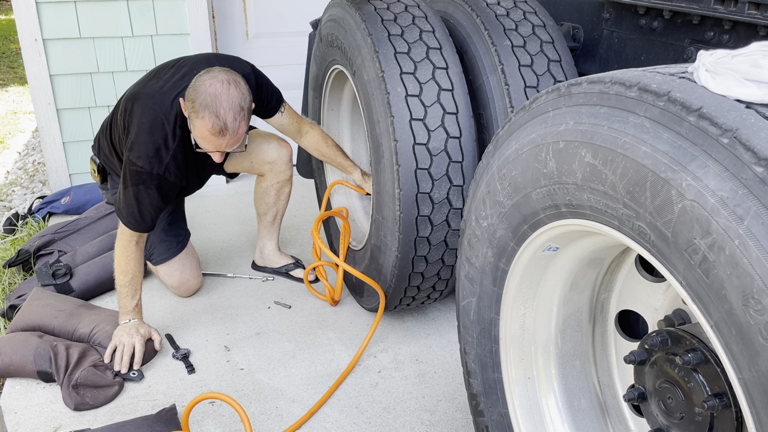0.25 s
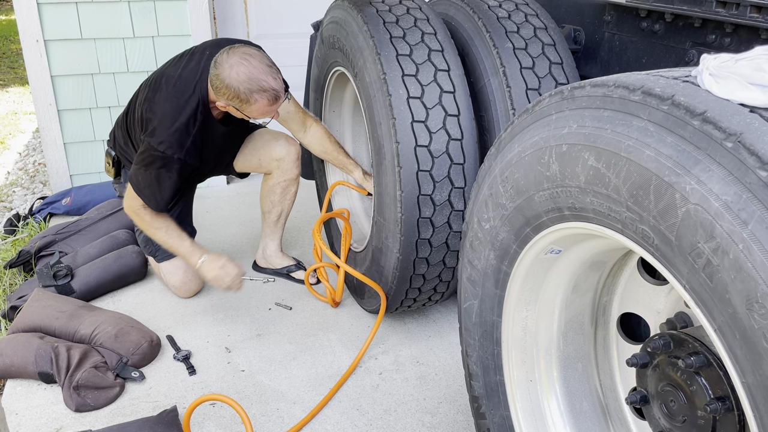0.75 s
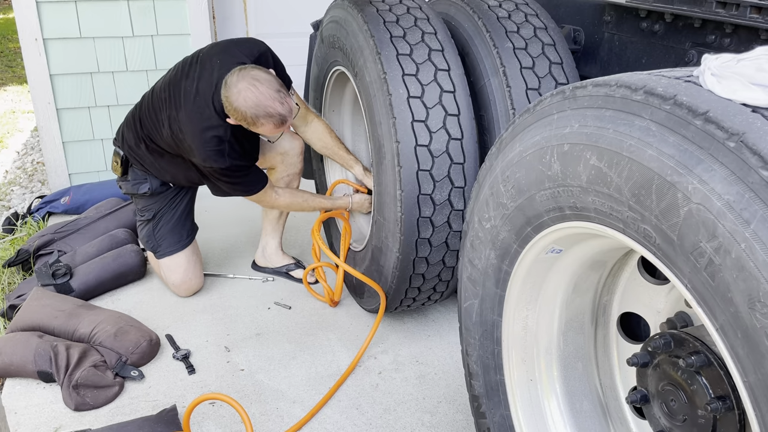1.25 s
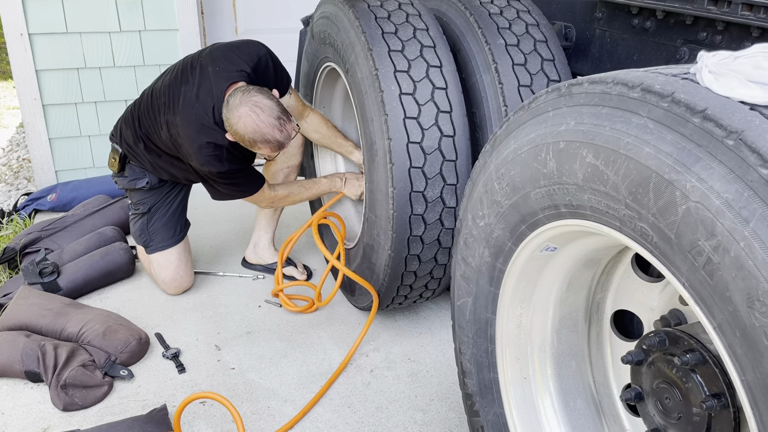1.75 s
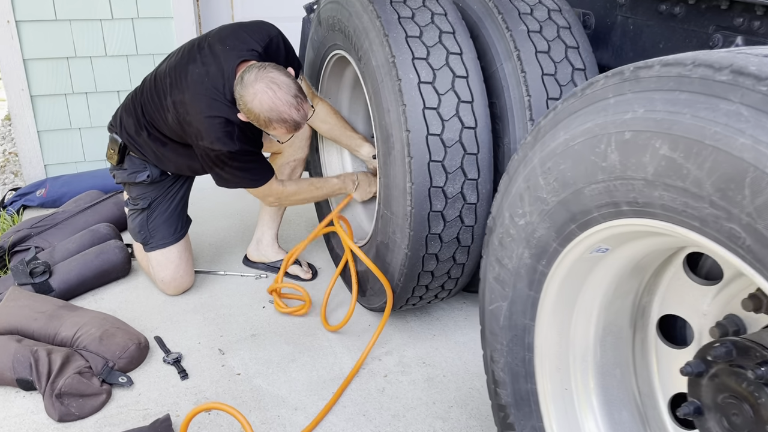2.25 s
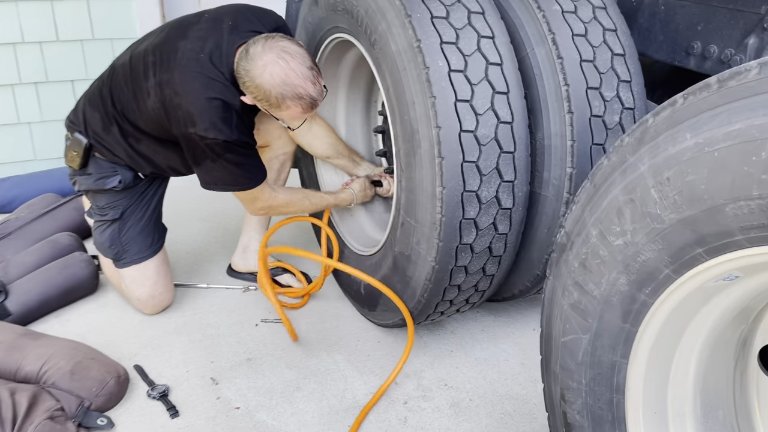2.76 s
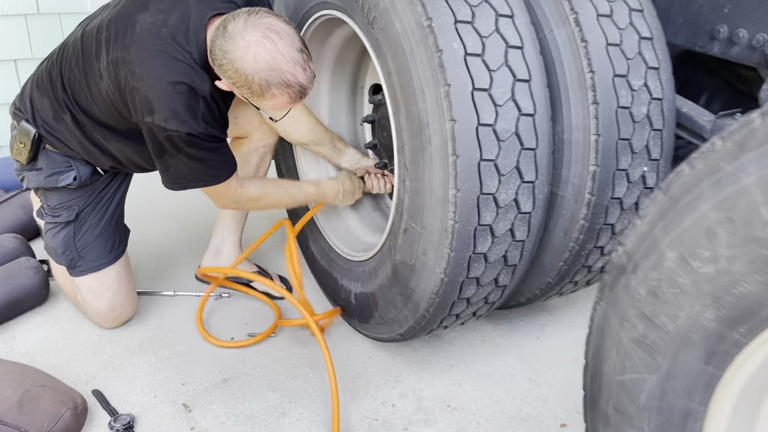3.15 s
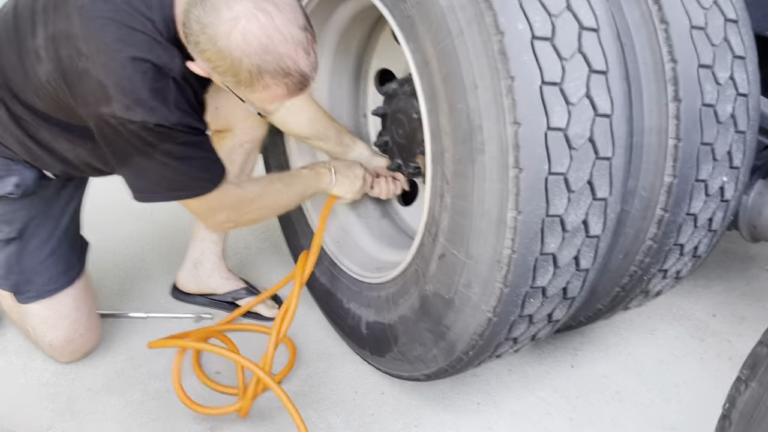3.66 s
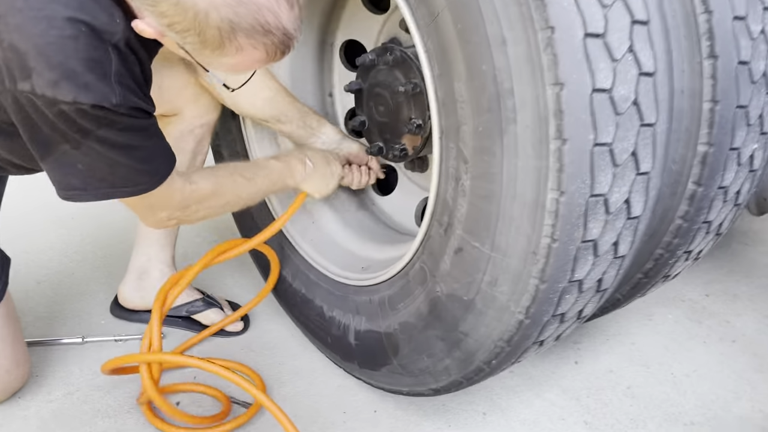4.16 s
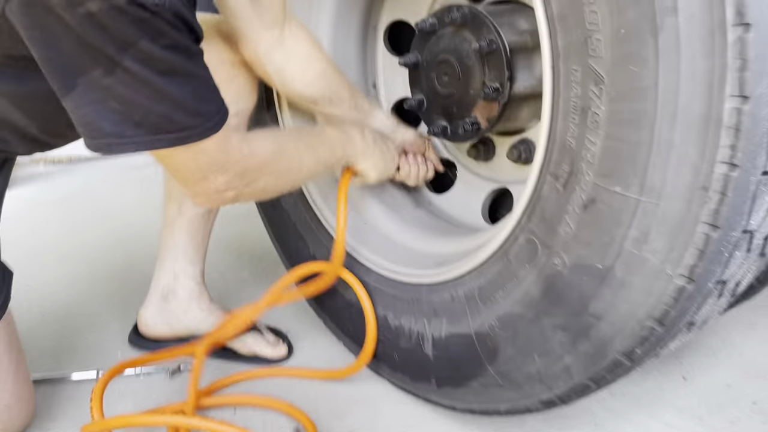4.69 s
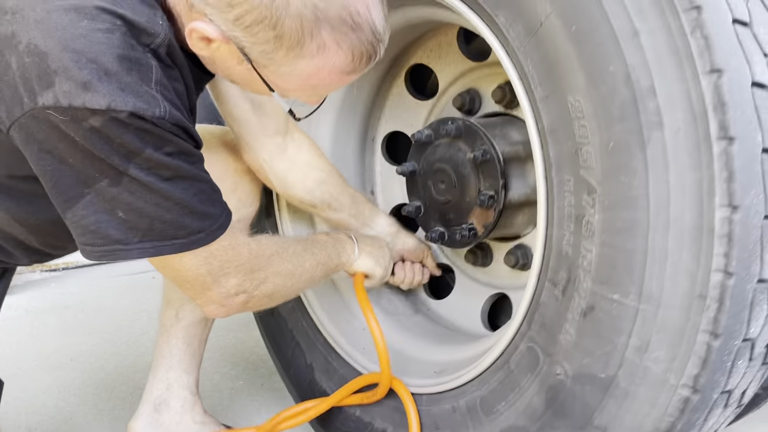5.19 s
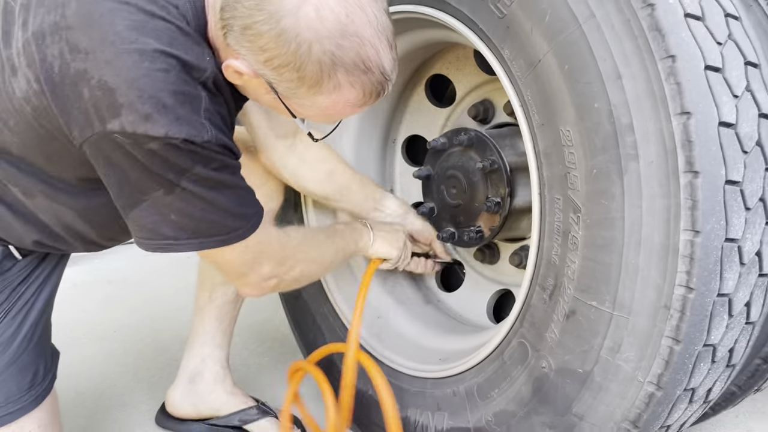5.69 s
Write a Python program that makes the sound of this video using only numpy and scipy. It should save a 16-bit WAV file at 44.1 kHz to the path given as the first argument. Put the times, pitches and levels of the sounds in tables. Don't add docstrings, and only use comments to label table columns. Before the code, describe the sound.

Steady rough diesel idle in a yard; as the listener walks up to a wheel, a bright air leak emerges, squeaks briefly, then metal clinks.

```python
import sys
import numpy as np
from scipy import signal
from scipy.fft import rfft, irfft, next_fast_len
from scipy.io import wavfile
from scipy.ndimage import uniform_filter1d

SR = 44100
rng = np.random.default_rng(int(sys.argv[2]) if len(sys.argv) > 2 else 0)


def output_pcm(signal):
    pcm = np.clip(np.atleast_2d(signal).T, -1, 1) * 32767
    wavfile.write(sys.argv[1], SR, np.round(pcm).astype(np.int16))


def undo_db(level):
    steps = np.asarray(level, float) / 20
    return 10 ** steps


N = 261513

CYCLE_HZ = 5.0
# f/Hz, share 0-1
LIKENESS = [(60, .98), (300, .85), (600, .55), (1000, .28), (2100, .1), (2700, .62), (4000, .72),
            (5000, .6), (6000, .7), (8000, .94), (12000, .955), (14500, .98)]
# f/Hz, share 0-1
REPEAT = [(100, .4), (300, .55), (800, .55), (1200, .45), (2000, .3), (3000, .2), (5000, .05)]


def rms_one(x):
    return x / np.sqrt(np.mean(x ** 2) + 1e-20)


def in_time(rows):
    s, *columns = np.transpose(rows)
    return [np.interp(np.arange(N) / SR, s, c) for c in columns]


def at_hz(points, hz):
    table_hz, values = np.array(points).T
    return np.interp(np.log(hz), np.log(table_hz), values)


def drift(rate):
    r = np.exp(-80 * np.pi * rate / SR)
    noise = rng.standard_normal(N // 40 + 2002)
    slow = signal.lfilter([1], [1, -2 * r, r * r], noise)[2000:]
    return np.interp(np.arange(N) / 40, np.arange(len(slow)), rms_one(slow))


def sine(hz, spread=0, partner=0):
    apart = spread * rng.uniform(-0.95, 1) * np.array([[1], [-1]])
    phase = 2 * np.pi * (np.cumsum(hz) / SR + rng.random()) + apart
    return np.sqrt(2) * np.imag((1 + partner) * np.exp(1j * phase))


def noise_bands(colour, low_hz):
    edges = low_hz * 2 ** (np.arange(40) / 3)
    edges = edges[edges < 19000]
    white = rng.standard_normal((2, 2, N))
    bands = []
    for k, (low, high) in enumerate(zip(edges, edges[1:])):
        band_pass = signal.butter(2, [low, high], "band", fs=SR, output="sos")
        mid, side = signal.sosfilt(band_pass, white[k % 2])
        hz = np.sqrt(low * high)
        alike = np.clip(at_hz(LIKENESS, hz), 0, 1)
        stereo = np.sqrt(1 + alike) * mid + np.sqrt(1 - alike) * side * [[1], [-1]]
        bands.append((hz, undo_db(at_hz(colour, hz)) * stereo))
    total = np.sqrt(sum(np.mean(b ** 2) for hz, b in bands))
    return [(hz, b / total) for hz, b in bands]


def repeating(x, share):
    size = round(SR / CYCLE_HZ)
    cycles = np.pad(x, [(0, 0), (0, -N % size)]).reshape(len(x), -1, size)
    fresh = np.sqrt(1 - share ** 2)
    cycles[:, 0] /= fresh
    return signal.lfilter([fresh], [1, -share], cycles, axis=1).reshape(len(x), -1)[:, :N]


def resonate(x, hz, width_hz):
    r, w = np.exp(-np.pi * width_hz / SR), 2 * np.pi * hz / SR
    return signal.lfilter([1, 0, -1], [1, -2 * r * np.cos(w), r * r], x)


def walked():
    # t/s, share of the way 0-1
    steps = [
        (0, 0.11),
        (2.3, 0.01),
        (2.9, 0.27),
        (3.6, 0.54),
        (4.4, 0.93),
        (5.93, 0.93),
    ]
    return np.clip(in_time(steps)[0], 0, 1)


def tyre_notch(hz, way):
    octaves = np.log2(hz / (242 + way * (472 - 242)))
    notch_db = -17 * np.exp(-(octaves / 0.29) ** 2)
    swell_db = 2 * np.exp(-(octaves / 0.88) ** 2)
    passing = np.exp(-((way - 0.55) / 0.28) ** 2)
    return (notch_db + swell_db) * passing


def compressor(k):
    beats = {12: (5, -6, .345), 20: (8, -8, .316), 22: (9, -3, 1.75), 24: (10, -4, .334)}
    if k not in beats:
        return 0
    compressor_hz = 12.258
    order, db, s = beats[k]
    beat_hz = order * compressor_hz - k * CYCLE_HZ
    return undo_db(db) * np.exp(2j * np.pi * beat_hz * (np.arange(N) / SR - s))


def engine_tones():
    main_orders = (18, 20, 22, 24, 36, 76, 222, 304)
    # first path level/dB, second path level/dB, opposition 0-1
    paths = [(-40.5, -32.5, 0.57), (-38, -43, .95), (-41, -44.5, 1), (-37, -39.5, 0.9), (-40, -42, 0.96),
             (-36.5, -37.5, 0.68), (-47.5, -53, 0.3), (-52, -56, .5)]
    weak_orders = (12, 30, 46, 15, 16, 26, 27, 28, 33, 34, 42, 48, 51, 52, 68, 82, 94, 105, 108, 123, 126,
                   129, 135, 138, 141, 144, 146, 150, 154, 156, 162, 171, 178)
    # beside the outer tyre/dB, passing it/dB, at the wheel/dB
    weak_levels = [(-37, -36, -40.5), (-40, -38, -47), (-48, -39, -40.5), (-45, -48, -47), (-52, -46, -44),
                   (-46, -44, -60), (-50, -43, -50), (-50, -45, -48), (-50, -48, -46), (-42, -48, -49),
                   (-47, -52, -53), (-45, -53, -49), (-49, -45, -43), (-47, -50, -45), (-50, -52, -48),
                   (-47, -48, -58), (-47, -48, -55), (-47, -48, -49), (-45, -46, -52), (-47, -50, -46),
                   (-48, -50, -48), (-43, -50, -49), (-46, -45, -53), (-52, -46, -44), (-50, -45, -46),
                   (-44, -49, -42), (-49, -50, -52), (-41.5, -52, -49), (-52, -45, -49), (-44, -46, -49),
                   (-41.5, -50, -44), (-46, -48, -50), (-48, -52, -56)]
    weak_way = (.1, .45, .88)
    cycle_hz = CYCLE_HZ * (1 + .00015 * drift(1))
    way = walked()
    curves = []
    for k, (first_db, second_db, opposed) in zip(main_orders, paths):
        first = (1 - way) * undo_db(first_db)
        second = way * undo_db(second_db) * np.exp(1j * np.pi * opposed)
        both_db = 20 * np.log10(np.abs(first + second) + 1e-6)
        curves.append((k, tyre_notch(k * CYCLE_HZ, way) + both_db))
    for k, row_db in zip(weak_orders, weak_levels):
        curves.append((k, np.interp(way, weak_way, row_db)))
    out = 0
    for k, db in curves:
        spread_rad = 1.0 * k * CYCLE_HZ / 1000
        out = out + undo_db(db + 0.9 * drift(4.0)) * sine(k * cycle_hz, spread_rad, compressor(k))
    return out


def firings():
    cylinders = [-12, -5, -2, -4, 4.5, -3]
    turns = 6 * CYCLE_HZ * np.arange(N) / SR
    burst = undo_db(np.array(cylinders)[turns.astype(int) % 6]) * np.exp(-3.0 * (turns % 1))
    return uniform_filter1d(burst, size=120)


def engine_roar(burst, way):
    # f/Hz, level/dB per Hz
    colour = [(30, -1.5), (60, -10), (110, -7.5), (200, -11), (350, -11), (500, -12.5), (750, -9.5),
              (1000, -11.5), (2000, -17), (3300, -27.5), (4100, -30.5), (7000, -41), (11000, -46),
              (15500, -91)]
    shifts = [-1, -0.4, -0.5]
    wanders = [.8, .3, .2]
    low_db, body_db, clatter_db = [shift_db * (way - .5) + wander_db * drift(0.31)
                                   for shift_db, wander_db in zip(shifts, wanders)]
    lope = drift(18.0)
    out = 0
    for hz, band in noise_bands(colour, 40):
        part_db = low_db if hz < 250 else body_db if hz < 1400 else clatter_db if hz < 4500 else 0
        depth = 0.14 * (400 < hz < 4500)
        level_db = part_db + tyre_notch(hz, way) - 25.5 + .5 * drift(7.1) + 1.0 * lope * (hz > 400)
        out = out + undo_db(level_db) * rms_one(1 + depth * burst) * repeating(band, at_hz(REPEAT, hz))
    return out


def engine_block(burst, way):
    # f/Hz, width/Hz
    modes = [(262, 49), (465, 55), (750, 97), (2050, 96), (3300, 89)]
    # beside the outer tyre/dB, at the wheel/dB
    mode_levels = [(-37.5, -41), (-34.5, -32), (-35.5, -36.5), (-42.5, -40.5), (-49.5, -70)]
    out = 0
    for (hz, width_hz), (far_db, near_db) in zip(modes, mode_levels):
        level_db = far_db + way * (near_db - far_db) + drift(0.4) + tyre_notch(hz, way)
        knocks = repeating(rng.standard_normal((2, N)), at_hz(REPEAT, hz)) * (1 + 0.62 * burst)
        ringing = resonate(knocks, hz, width_hz)
        crossed = 0.6 * at_hz(LIKENESS, hz) * ringing[::-1]
        out = out + undo_db(level_db - 0.5) * rms_one(ringing + crossed)
    return out


def yard(x, way):
    dull = signal.sosfilt(signal.butter(1, 3500, fs=SR, output="sos"), x)
    lags = (rng.uniform(.014, .045, (2, 5)) * SR).astype(int)
    far, near = [sum(np.roll(dull, lag, axis=1) * (-1) ** k for k, lag in enumerate(row)) for row in lags]
    out = x + undo_db(-19) * (np.sqrt(1 - way) * far + np.sqrt(way) * near)
    return rms_one(out) * np.sqrt(np.mean(x ** 2))


def engine():
    burst, way = firings(), walked()
    noise = engine_roar(burst, way) + engine_block(burst, way)
    return engine_tones() + yard(noise, way)


def hollows():
    # centre t/s, length/s, f/Hz, width/Hz, level/dB
    gaps = [(2.45, 0.68, 900, 44, -35), (2.36, 0.53, 520, 40, -37), (2.93, .3, 455, 30, -34.5),
            (3.28, 0.24, 486, 30, -35), (3.18, .35, 412, 25, -40), (1.3, 3.4, 745, 50, -39.5),
            (3.8, .7, 254, 27, -36.5), (3.9, 0.37, 720, 40, -34.5), (4.55, 0.28, 680, 50, -33.5),
            (5.5, .3, 680, 60, -30.5), (2.22, .2, 3450, 250, -47)]
    t, out = np.arange(N) / SR, 0
    for s, length, hz, width_hz, db in gaps:
        noise = repeating(rng.standard_normal((2, N)), at_hz(REPEAT, hz))
        ringing = resonate(noise, hz, width_hz)
        passing = np.exp(-(2 * (t - s) / length) ** 2)
        out = out + undo_db(db) * passing * rms_one(ringing + 0.41 * ringing[::-1])
    return out


def squeaks():
    # centre t/s, length/s, f/Hz, level/dB
    whistles = [
        (4.278, .045, 5500, -51),
        (4.314, .038, 5700, -46),
        (4.355, .045, 5620, -45),
        (5.46, .04, 4950, -53),
        (5.775, .025, 6950, -47),
    ]
    t, chance, waver = np.arange(N) / SR, drift(40), drift(41.0)
    throb_db = 1.5 * chance + 6.5 * np.cos(2 * np.pi * 64 * (t - 4.322)) - 3
    out = 0
    for s, length, hz, db in whistles:
        swell = np.exp(-(2 * (t - s) / length) ** 4)
        out = out + undo_db(db + throb_db) * swell * sine(hz + 25 * waver)
    return out


def clink():
    # t/s, level/dB
    contacts = [
        (5.6325, -30),
        (5.6333, -21),
        (5.6346, -19),
        (5.6362, -19.5),
        (5.6385, -23),
        (5.6425, -29),
        (5.6495, -30),
    ]
    # f/Hz, level/dB, t60/s
    modes = [(420, -9, .04), (720, -8, .05), (1090, 1, .035), (1500, -4, .02), (2150, -10, .025),
             (2540, -8, .04), (2830, -9, .03), (3160, -1, .03), (3520, -8, .055), (4120, 0, .035),
             (4820, -18, .02), (6650, -10, .035), (9600, -10, .05), (10340, -7, .025), (11080, -12, .02),
             (12090, -13, .012)]
    at, strength_db = [round(s * SR) for s, db in contacts], np.array(contacts)[:, 1]
    chance = rng.standard_normal((len(contacts), len(modes)))
    clicks = np.full(N, 1e-18)
    clicks[at] = undo_db(strength_db - 14.0)
    dying = signal.lfilter([1], [1, -undo_db(-60 / (.02 * SR))], clicks) * rng.standard_normal((2, N))
    crack_band = signal.butter(1, [1000, 9000], "band", fs=SR, output="sos")
    out = signal.sosfilt(crack_band, dying + 1.0 * dying[0])
    lag = round(.00027 * SR)
    out[1] = np.roll(out[1], lag)
    for (hz, level_db, t60), luck in zip(modes, chance.T):
        clicks[at] = undo_db(strength_db + level_db + 1.5 * luck)
        clicks[at[0]] *= undo_db(13 * (hz > 6000))
        r, w = undo_db(-60 / (t60 * SR)), 2 * np.pi * hz / SR
        ringing = signal.lfilter([0, np.sin(w)], [1, -2 * r * np.cos(w), r * r], clicks)
        out += [ringing, np.roll(ringing, lag * (hz < 2300))]
    return out


def leak():
    # t/s, level/dB
    course = [(0, -52.5), (.9, -55), (1.3, -51), (2.1, -54), (2.42, -49.5), (2.62, -60), (2.84, -60),
              (2.94, -53), (3.0, -41.5), (3.8, -38.5), (4.7, -39), (5.2, -40.5), (5.6, -37), (5.93, -39)]
    # f/Hz, level/dB per Hz
    colour = [(2500, -24), (4000, -12.5), (6000, -0.5), (8000, -2.5), (10000, 1), (12500, -2.5),
              (15600, -2.5)]
    # centre t/s, length/s, level/dB
    grips = [(2.87, .03, 8), (3.18, 0.082, -2), (3.324, 0.069, 0), (3.464, 0.092, -3.5), (3.72, .05, -2),
             (3.79, 0.036, 2.5), (3.883, 0.072, -10), (3.972, 0.044, -7), (4.05, 0.095, 0),
             (4.282, 0.24, -3), (4.55, .04, 1), (4.738, .05, -4), (4.8, 0.061, 4), (4.94, .08, -2),
             (5.01, .04, 2.5), (5.1, 0.077, -1.5), (5.2, 0.12, 4), (5.29, .07, -5), (5.47, .07, 4.5),
             (5.75, .04, 0.5), (5.8, .06, 2), (5.92, 0.065, -3)]
    # centre t/s, length/s, level/dB
    shades = [
        (3.19, .1, -7),
        (4.11, .28, -9),
        (4.9, .08, -7),
        (5.08, .1, -8),
        (5.24, .09, -8),
        (5.555, .06, -7),
        (5.86, .06, -6),
    ]
    t = np.arange(N) / SR
    level_db, = in_time(course)
    screened_to_clear = [-52, -43]
    low_db = np.interp(level_db, screened_to_clear, [4.5, -1.5])
    level_db = level_db + sum(db * np.exp(-(2 * (t - s) / length) ** 2) for s, length, db in grips)
    top_db = np.interp(level_db, screened_to_clear, [-6, 1])
    top_db = top_db + sum(db * np.exp(-(2 * (t - s) / length) ** 4) for s, length, db in shades)
    flutter = drift(32)
    jet = 0
    for hz, band in noise_bands(colour, 2144):
        band_db = 0.68 * flutter + 0.86 * drift(13) + low_db * (hz < 8000) + top_db * (hz > 14000)
        jet = jet + undo_db(band_db) * band
    return undo_db(level_db) * jet


def scene():
    # beside the outer tyre/dB, at the wheel/dB
    lean = (0.26, 1)
    lean_db = np.interp(walked(), [0, 1], lean) * np.array([[.5], [-.5]])
    return undo_db(lean_db) * engine() + hollows() + squeaks() + clink() + leak()


def band_limit(x):
    return signal.sosfilt(signal.butter(12, 15910, fs=SR, output="sos"), x)


def record(dry):
    # f/Hz, left minus right level/dB
    balance = [(60, -1), (110, -2), (200, -2.5), (380, -3), (700, -5), (1290, -4), (2380, -0.5), (4400, 3),
               (8120, 0), (15000, -0.5)]
    # f/Hz, phase/rad
    lead = [(0, 0), (690, -1.5), (1500, -2.1), (2000, -3.4), (2500, -5.6), (4100, -6.4), (5100, -5.6),
            (6500, -7.1), (7400, -8.3), (8180, -9.42), (9000, -10.3), (10000, -11.2), (11700, -12.57),
            (14750, -15.5), (15800, -16.42)]
    # f/Hz, level/dB
    peak = [(2700, 0), (3150, 2), (3550, 2), (3800, -2), (4300, -1), (6200, 1), (7500, 0), (12000, 0),
            (12800, -1.5), (13400, 1.5), (14100, 4.5), (15100, 6), (15500, 8), (15730, 7.5), (15900, -40)]
    size = next_fast_len(N + 4096)
    hz = np.arange(size // 2 + 1) * SR / size + 1e-3
    half = undo_db(at_hz(balance, hz) / 2) * np.exp(.5j * np.interp(hz, *np.transpose(lead)))
    rounded = .5 * np.tanh(dry / .5)
    spectrum = rfft(rounded, size) * undo_db(at_hz(peak, hz)) * [half, 1 / half]
    ports = irfft(spectrum, size)[:, :N]
    ports = signal.sosfilt(signal.butter(4, 45, "high", fs=SR, output="sos"), ports)
    return band_limit(ports)


dry = scene()
out = record(dry)
output_pcm(out)
```